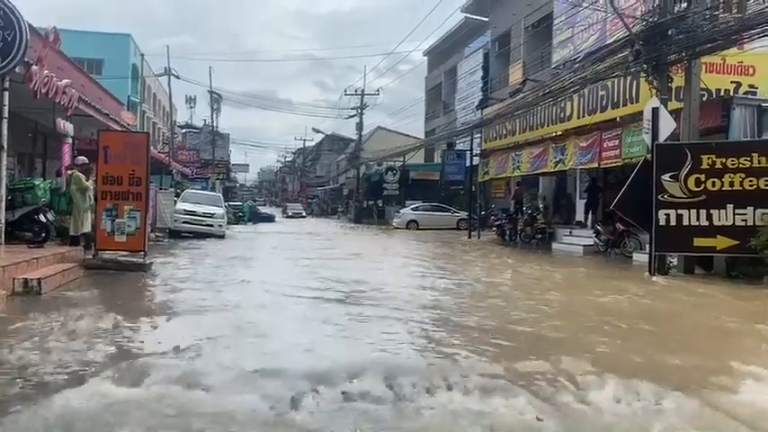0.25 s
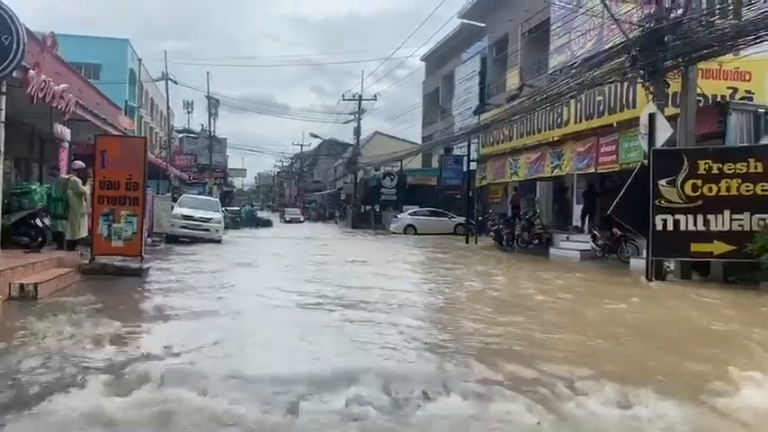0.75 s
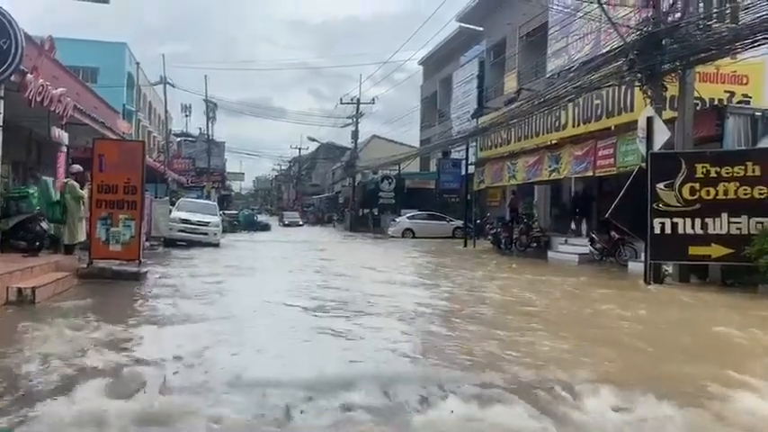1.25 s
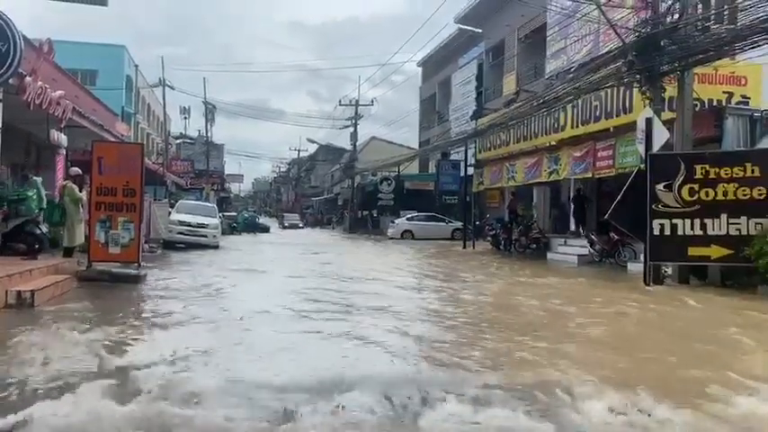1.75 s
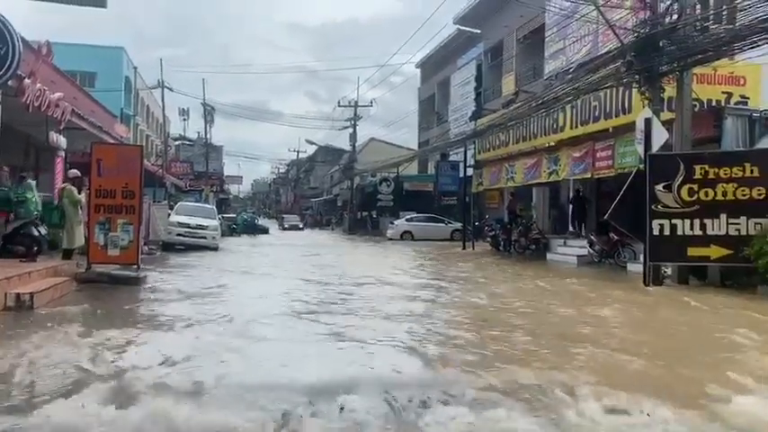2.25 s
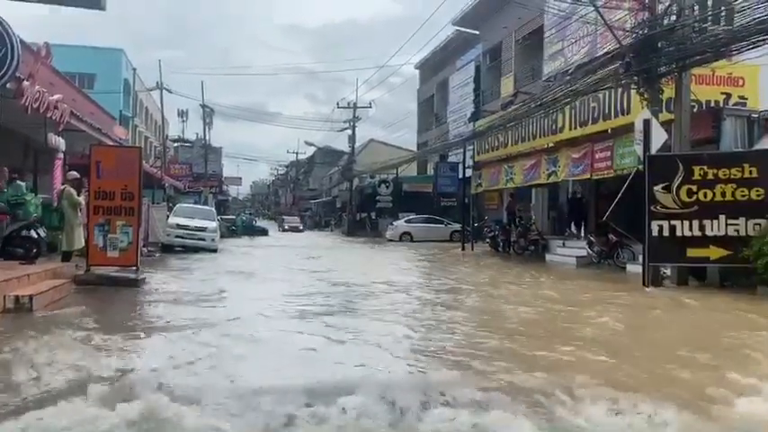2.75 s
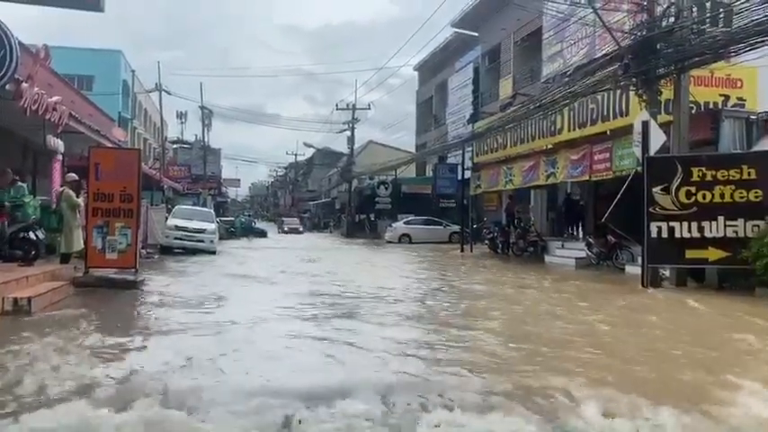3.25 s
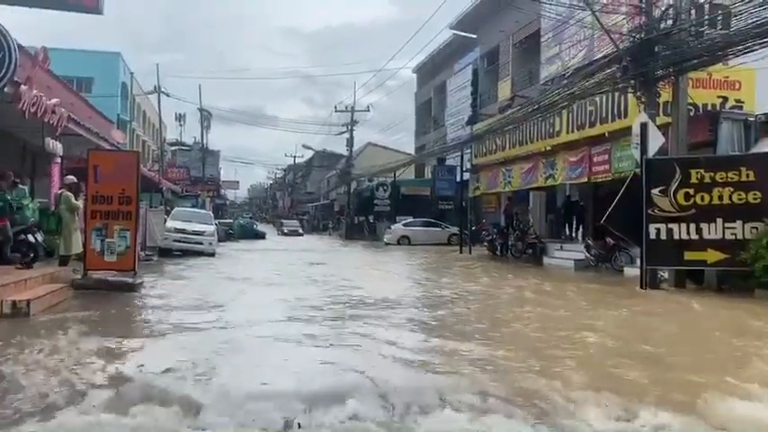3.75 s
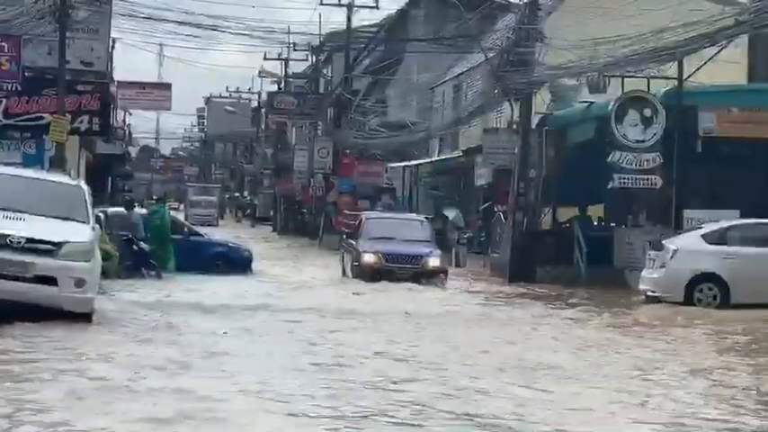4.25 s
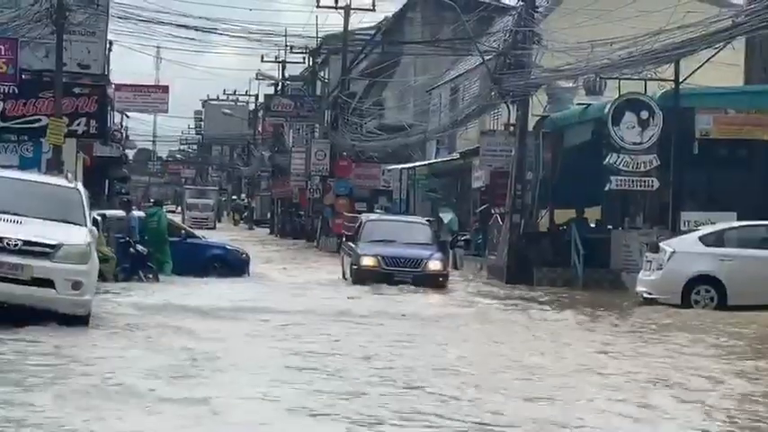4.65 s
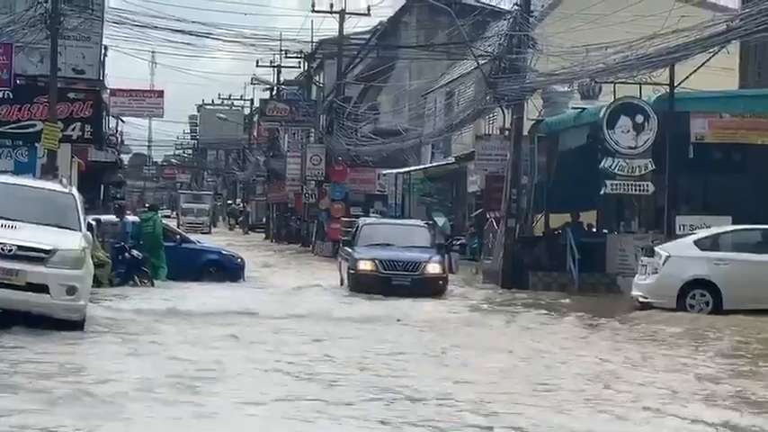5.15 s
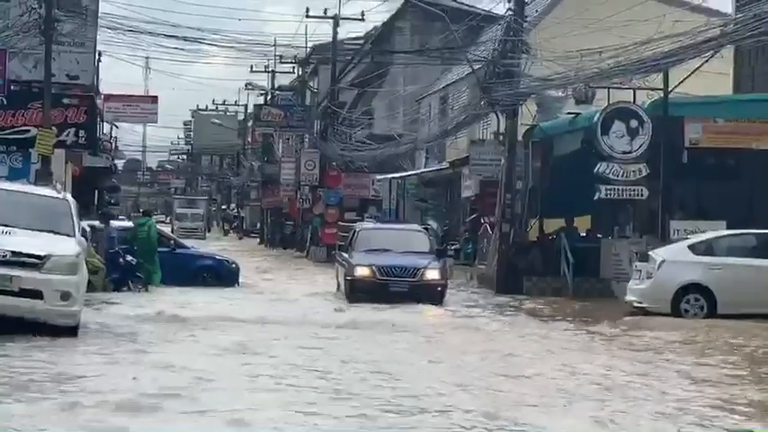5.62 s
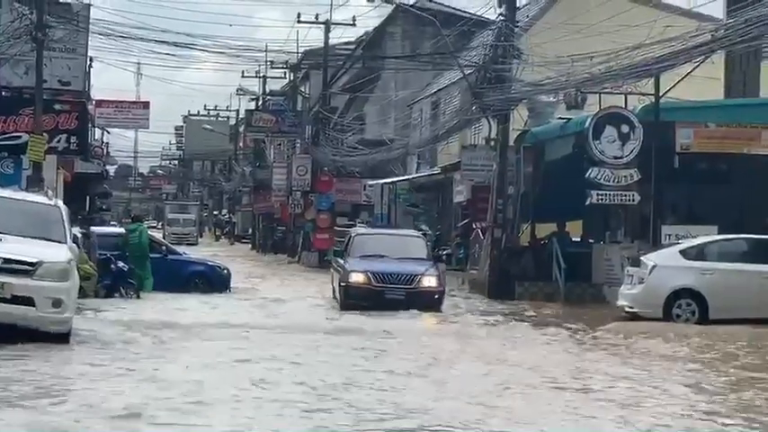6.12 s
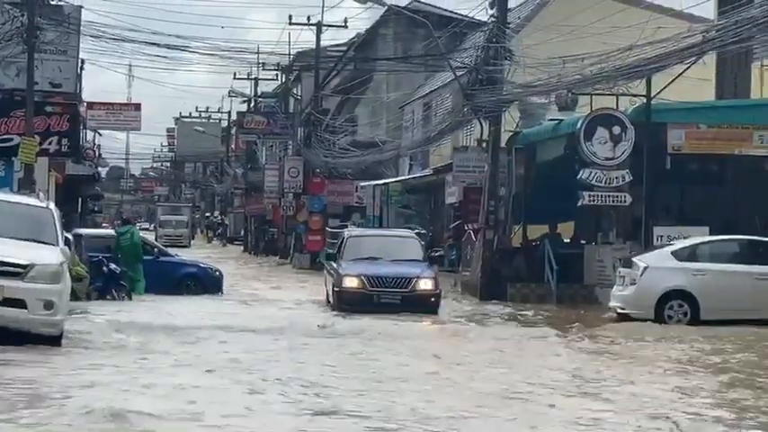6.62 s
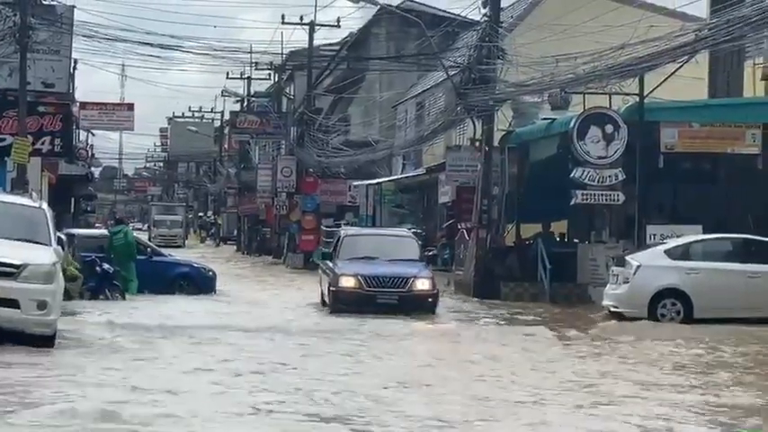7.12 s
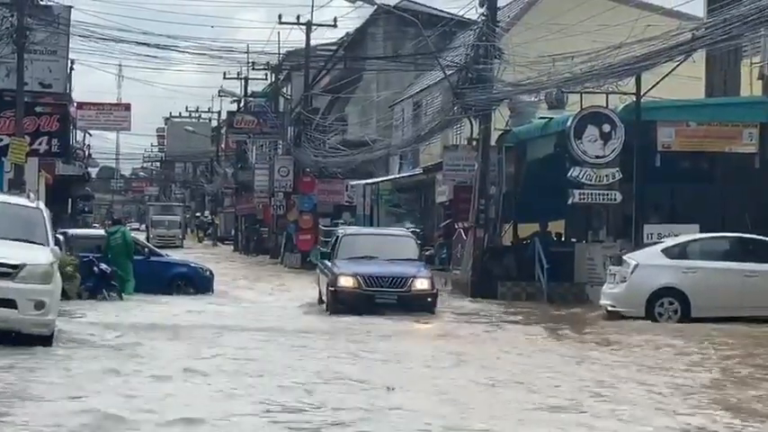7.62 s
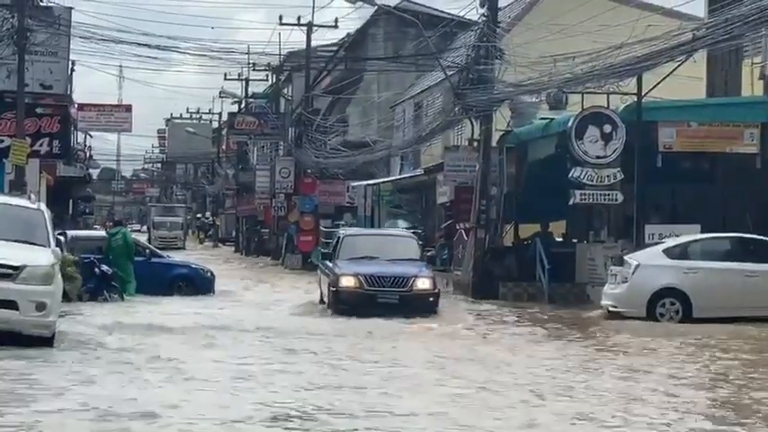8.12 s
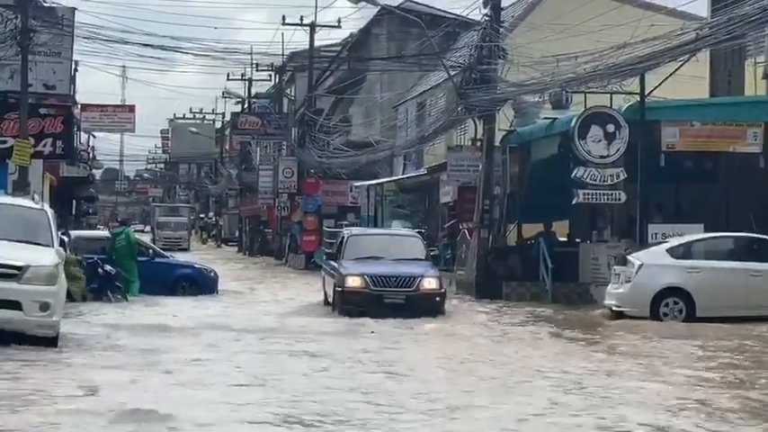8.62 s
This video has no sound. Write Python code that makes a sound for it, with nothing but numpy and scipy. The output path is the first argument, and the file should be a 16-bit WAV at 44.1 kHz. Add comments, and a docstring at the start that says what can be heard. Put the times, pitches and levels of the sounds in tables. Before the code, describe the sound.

Close, wide outdoor stereo of floodwater frothing against a moving vehicle. The first part is a steady, bubbly rush with hissing spray, scattered rising plops and bassy drive rumble. After an abrupt edit the treble sits more centrally, the water slaps and swells unevenly, a low resonant body drone comes and goes, and occasional drops tick nearby.

```python
"""Vehicle wading a flooded street

Heard from on board in the rain: a bow wave of bubbles and patchy noise churns, froths and sprays.
A low noise rumble and a hollow resonant drone lie underneath; air pockets plop as rising sine bubbles.
A few close drops tick as short ringing modes with spatter. A cut with a very short gap joins two passages
of the wading; after it the tone and stereo image change, the wash swells heavier and the drone surges."""
import sys
import numpy as np
from scipy import signal
from scipy.fft import rfft, irfft, next_fast_len
from scipy.io import wavfile
from scipy.ndimage import uniform_filter1d, map_coordinates

SR = 44100
rng = np.random.default_rng(int(sys.argv[2]) if len(sys.argv) > 2 else 0)


def to_wav(sig):
    """Store sig (one row per channel, or 1-D mono) as 16-bit WAV at the path in sys.argv[1].

    Samples outside -1..1 are clipped; the rate is SR.
    """
    pcm = np.clip(np.atleast_2d(sig), -1, 1) * 32767
    pcm = np.round(pcm).astype(np.int16)
    wavfile.write(sys.argv[1], SR, pcm.T)  # frames by channels


N = 391378  # length in samples


def amp(db):
    """Decibels to gain."""
    return 10 ** (np.asarray(db) / 20)


def unit(x):
    """x at rms 1."""
    return x / np.sqrt(np.mean(x ** 2) + 1e-20)


def along(points, hz):
    """(f/Hz, value) points read on a log frequency axis."""
    f, v = np.transpose(points)
    return np.interp(np.log(hz + 1), np.log(f + 1), v)


def curves(rows):
    """One value per sample for each column after the time."""
    s, *cols = np.transpose(rows)
    return [np.interp(np.arange(N) / SR, s, c) for c in cols]


def wobble(rate):
    """A smooth random curve, rate knots a second."""
    s = np.linspace(0, N / SR, 2048)
    knots = rng.standard_normal(1024)
    curve = map_coordinates(knots, [s * rate], mode="wrap")
    return np.interp(np.arange(N) / SR, s, curve)


def swells(rows):
    """The summed lift in dB of (t/s, level/dB, length/s) events that each come and go as a smooth bell."""
    t = np.arange(N) / SR
    return sum(db * np.exp(-((t - s) / length) ** 2) for s, db, length in rows)


def filtered(x, response):
    """x times a response of frequency."""
    m = next_fast_len(N + 8192)
    return irfft(rfft(x, m) * response(np.fft.rfftfreq(m, 1 / SR)), m)[..., :N]


def coloured(x, spectrum):
    """x through a (f/Hz, level/dB) spectrum, at rms 1."""
    return unit(filtered(x, lambda hz: amp(along(spectrum, hz))))


def rush(patchy_db):
    """Mid and side noise whose strength varies in small patches of time and pitch."""
    z = signal.stft(rng.standard_normal((2, N)), nperseg=512)[2]
    field = rng.standard_normal(z.shape[1:])
    field = uniform_filter1d(field, size=4, axis=0)  # across pitch
    field = uniform_filter1d(field, size=6, axis=1)  # across time
    noise = signal.istft(z * amp(patchy_db * unit(field)), nperseg=512)[1]
    return unit(noise[:, :N])


def bubbles(lo_hz, hi_hz, cycles, rise, spread_db, count, size):
    """Mid and side of count bubbles: each rings for some cycles and rises in pitch as it nears the surface."""
    when, pitch, luck, place = rng.random((count, 4)).T[:, :, None]
    hz = lo_hz + (hi_hz - lo_hz) * pitch
    turns = (hz * np.arange(size) / SR).astype(np.float32)
    age = turns / cycles
    strength = amp(spread_db * luck ** 2) * np.sqrt(hz)  # most are faint, a few stand out
    ring = strength * np.exp(-np.pi * age) * np.sin(2 * np.pi * turns * (1 + rise * age / 2))
    index = ((when * N).astype(int) + np.arange(size)).ravel()
    gains = (1, 2 * place - 1)  # mid, side
    return np.array([unit(np.bincount(index, (ring * g).ravel(), N)[:N]) for g in gains])


def water(spectrum, grains, grain_db, patchy_db):
    """A bed of countless merged bubbles, as patchy noise, with the nearest ones on top, at rms 1."""
    return unit(coloured(rush(patchy_db), spectrum) + amp(grain_db) * coloured(grains, spectrum))


def wash():
    """Decibels by which the wash is stronger than usual."""
    # strength of the wash at the bow, steady at first, then swelling: (t/s, level/dB)
    wash_strength = [(0, -27.5), (1, -27), (2, -27), (3.7, -27.5), (4.4, -25.8), (5.5, -24), (6.5, -23.3),
                     (7.4, -26), (7.9, -23.5), (8.4, -24), (8.85, -25.5)]
    usual_db = -25.5
    return curves(wash_strength)[0] - usual_db


def bow_wave():
    """Tumbling water: large bubbles in the churn, small ones in the froth, ticking droplets in the spray."""
    # spectra of the three layers: (f/Hz, level/dB)
    churn_spectrum = [(60, -30), (125, 2), (190, 1.5), (330, 2), (390, -1.5), (480, 1), (720, -1),
                      (950, -6), (1400, -20), (3000, -53)]
    froth_spectrum = [(400, -24), (800, -4), (1100, -1.5), (1400, -1), (1850, 1), (2200, -2.5), (2700, -6),
                      (3600, -12.5), (7000, -31.5)]
    spray_spectrum = [(1500, -19.5), (2800, -3.5), (3800, -1.5), (5000, -3), (7000, -3.5), (8500, -3.5),
                      (10000, -5), (12000, -7.5), (14000, -8.5), (15500, -23)]
    # heavier waves breaking on the bow: (t/s, churn lift/dB, froth lift/dB, length/s)
    waves = [(0.506, 0.7, 1.5, 0.11), (1.4, 0.5, 0.5, 0.072), (2.36, 1.5, 4.5, 0.021), (4.43, 2, -0.7, .07),
             (5.11, 3, 0.5, 0.025), (5.34, 0.5, 1, 0.073), (5.75, 2.5, 1.5, 0.036), (5.941, 2, 2.5, 0.03),
             (6.621, 3.5, 1.5, 0.033), (6.832, 3, 1.6, 0.052), (7.094, 2, 0.3, .07), (7.42, 3, 1.3, 0.064),
             (7.786, -2.5, 3, 0.051), (8.071, 1.5, 1.5, .05), (8.38, 0.5, 2, .045)]
    # sheets of spray thrown up by the bow: (t/s, lift/dB, length/s)
    sheets = [(0.08, 3, 0.12), (0.76, 3, 0.18), (3.66, 3.5, 0.25), (4.62, 3, 0.15)]
    fizz_db = -12.5  # the smallest ringing bubbles, against the spray

    # each layer: level in dB at the usual wash, dB gained per dB more of wash, then its own events
    wash_db = wash()
    churn_db = -27.5 + 0.37 * wash_db + swells([(s, db, length) for s, db, _, length in waves])
    froth_db = -28.5 + 0.37 * wash_db + swells([(s, db, length) for s, _, db, length in waves])
    spray_db = -33 + 0.26 * wash_db + swells(sheets)

    # slow and quick unrest shared by all three, then some of each layer's own
    surge, slosh = wobble(5), wobble(22)
    churn_db = churn_db + 0.25 * surge + 0.59 * slosh + 0.18 * wobble(12)
    froth_db = froth_db + 0.15 * surge + 0.35 * slosh + 0.48 * wobble(12)
    spray_db = spray_db + 0.1 * surge + 0.5 * slosh + 0.19 * wobble(11)

    large = bubbles(259.7, 1177, cycles=19, rise=0.065, spread_db=14.5, count=900, size=2000)
    small = bubbles(803, 4247, cycles=93, rise=0.088, spread_db=14, count=1500, size=1000)
    droplets = bubbles(2250, 15000, cycles=4.1, rise=0.09, spread_db=12, count=5000, size=64)
    fizz = bubbles(2500, 7010, cycles=91, rise=0.03, spread_db=11, count=1300, size=700)

    churn = water(churn_spectrum, large, grain_db=-6.5, patchy_db=0.87)
    froth = water(froth_spectrum, small, grain_db=-8.0, patchy_db=1.24)
    spray = water(spray_spectrum, droplets, grain_db=-7.5, patchy_db=1.8)
    spray = unit(spray + amp(fizz_db) * coloured(fizz, spray_spectrum))
    return amp(churn_db) * churn + amp(froth_db) * froth + amp(spray_db) * spray


def drive_rumble():
    """The vehicle's drive: low noise in a bass-heavy spectrum, its level lumpy."""
    # spectrum of the rumble: (f/Hz, level/dB)
    rumble_spectrum = [(20, -33), (31, -21), (42, -9), (52, -3), (78, 0.5), (102, -2), (135, -13.5),
                       (220, -10), (500, -84)]
    # course of the rumble before its trim: (t/s, level/dB)
    drive_course = [(0, -31), (.7, -36), (1.2, -34.5), (1.9, -33), (2.5, -33.5), (2.85, -33), (3.4, -32.5),
                    (3.9, -31), (4.6, -34), (5.3, -34), (6.1, -31.8), (6.8, -32.5), (7.7, -31.3),
                    (8.4, -31.5), (8.85, -33)]
    trim_db, lumps_db = 0.65, 0.5
    level_db = curves(drive_course)[0] + trim_db + lumps_db * wobble(10)
    return amp(level_db) * coloured(rng.standard_normal((2, N)), rumble_spectrum)


def hollow_drone():
    """The vehicle's body: noise rings its resonances, which surge in level and drift in pitch."""
    # resonances of the body before the drift: (f/Hz, width/Hz, level/dB)
    resonances = [(153.5, 12, -8.5), (177, 9.4, -9), (246, 8.1, -22), (284.7, 15.5, -1),
                  (302.5, 14.5, -0.5), (453.4, 27, -8.5), (687, 123, -13)]
    # level of the drone: (t/s, level/dB)
    drone_course = [(0, -36), (2.4, -36.5), (3.8, -37.5), (3.95, -29), (4.08, -33), (4.3, -31), (4.52, -28),
                    (4.65, -38), (4.83, -27.5), (5.75, -29), (5.95, -22), (6.03, -34), (6.16, -27.5),
                    (6.77, -27), (6.85, -39), (7.01, -28), (7.09, -33), (7.22, -22), (7.3, -30.5),
                    (7.7, -27), (7.82, -37), (7.99, -28), (8.2, -39), (8.4, -31.5), (8.85, -29)]
    # drift of its pitch: (t/s, ratio)
    drift = [(0, 0.99), (4.3, 0.97), (4.9, 1), (5.5, 1.02), (5.95, 1.03), (6.4, 0.93), (6.65, 0.96),
             (7.22, 1.04), (7.45, 0.94), (7.75, 1), (8.3, 1.05)]
    waver, waver_per_s = 0.013, 9  # quick random bends on top of the drift, as a ratio

    def body(f):
        return sum(amp(db) * 1j * f * w / (c * c - f * f + 1j * f * w) for c, w, db in resonances)

    ring = filtered(rng.standard_normal((2, N)), body)
    ring = ring / np.sqrt(uniform_filter1d(ring ** 2, size=7000, axis=1))  # steadied before its level is set
    # reading the ring faster or slower bends its pitch
    clock = np.cumsum(curves(drift)[0] + waver * wobble(waver_per_s)) % N
    bent = np.array([np.interp(clock, np.arange(N), r) for r in ring])
    return amp(curves(drone_course)[0] + 0.3 * wobble(7)) * bent


def gurgles():
    """Close air pockets: each rings as one bubble of rising pitch, with tiny bubbles breaking off as froth."""
    # the pockets, levels before the 5 dB trim: (t/s, peak level/dB, starting f/Hz)
    pockets = [(.247, -23, 1981), (.329, -19, 4330), (0.67, -28, 3273), (.812, -30, 4478),
               (0.869, -22, 2030), (1.413, -16, 1900), (1.688, -25, 4651), (1.962, -21, 2570),
               (2.267, -21, 2420), (2.346, -14, 1950), (2.360, -12.5, 2110), (2.374, -20, 2050),
               (2.396, -15, 1970), (2.904, -16.5, 2800), (2.944, -14.5, 2110), (3.390, -18, 1640),
               (3.453, -23, 2256), (3.679, -24, 3703), (3.972, -25, 4670), (4.557, -19, 1540),
               (5.110, -16, 854), (5.745, -10, 699), (6.493, -21, 3525), (6.512, -16, 2030),
               (6.784, -19, 4250), (7.213, -17, 1972), (7.442, -14.5, 1529), (8.056, -17, 1960),
               (8.532, -15, 1798), (8.729, -18, 2060)]
    t60_s, attack_s, rise_per_s = 0.066, 0.00086, 1.1
    froth_db, trim_db = -6, -5.0
    out, t = np.zeros(N + SR), np.arange(SR // 10) / SR
    envelope = (1 - np.exp(-t / attack_s)) * amp(-60 * t / t60_s)
    for s, db, hz in pockets:
        bubble = envelope * np.sin(2 * np.pi * hz * t * (1 + rise_per_s * t / 2))
        band = signal.butter(2, [hz * .85, hz * 1.18], "band", fs=SR)
        froth = signal.lfilter(*band, rng.standard_normal(len(t)))
        plop = bubble + amp(froth_db) * envelope * unit(froth)
        out[round(s * SR):][:len(t)] += amp(db + trim_db) * plop / np.abs(plop).max()
    return out[:N]


def drops():
    """Close drops: each gives a sharp tick of four decaying modes and a short noise spatter."""
    # drops landing close by: (t/s, peak level of the ring/dB, f/Hz)
    landings = [(3.1625, -8, 2800), (3.172, -19, 2000), (3.187, -19, 2300), (3.621, -18, 2600),
                (3.643, -10.5, 3050), (3.864, -23, 3000), (3.883, -21, 5470), (3.962, -17, 3730),
                (4.138, -19, 2670), (4.661, -13.5, 3600), (4.858, -20, 3590), (6.022, -19, 3800),
                (6.037, -17, 2850), (6.645, -20, 7500), (7.789, -18, 2670), (8.433, -19, 7480),
                (8.490, -11, 4890), (8.595, -19, 2577)]
    # ring of a drop: (multiple of its pitch, level/dB, t60/s)
    modes = [(.65, -6, .009), (.88, 1, .007), (1.1, 0.5, 0.0063), (1.5, -1, 0.0081)]
    spatter_db, spatter_t60_s = -18, 0.075  # against the ring's peak
    out, t = np.zeros(N + SR), np.arange(SR // 10) / SR
    for s, db, hz in landings:
        ring = np.zeros(len(t))
        for k, (ratio, level, t60) in enumerate(modes):
            polarity = (-1) ** k
            ring += polarity * amp(level - 60 * t / t60) * np.sin(2 * np.pi * hz * ratio * t)
        band = signal.butter(2, [hz / 2, hz * 2], "band", fs=SR)
        spatter = unit(signal.lfilter(*band, rng.standard_normal(len(t))))
        tick = ring / np.abs(ring).max() + amp(spatter_db - 60 * t / spatter_t60_s) * spatter
        out[round(s * SR):][:len(t)] += amp(db) * tick
    return out[:N]


def placed(bed, image):
    """Mid and side: the diffuse wash, plus the part of the centre that leans to one ear or reaches it first."""
    hz_points, *cols = np.transpose(image)

    def read(k, hz):
        return along(np.transpose([hz_points, cols[k]]), hz)

    diffuse = filtered(bed[1], lambda hz: amp(read(0, hz)))
    direct = filtered(bed[0], lambda hz: read(1, hz) + 1j * read(2, hz))
    return np.array([bed[0], diffuse + direct])


def scene():
    """Two passages joined at a cut, each with its own tone and stereo image; the bass is alike in both ears."""
    # brief gap at the cut: (t/s, gain)
    gap = [(3.81, 1), (3.835, 0.54), (3.855, 0.014), (3.872, 0.52), (3.895, 0.9)]
    # colour of water and vehicle before the cut: (f/Hz, level/dB)
    early_tone = [(150, 0.5), (230, -2.5), (460, -0.5), (750, -1), (1250, 1), (1750, -3), (2150, -1.5),
                  (3100, -3), (4300, -1), (7300, -4), (10000, 0)]
    # stereo images before and after the cut: (f/Hz, gain of the diffuse side/dB,
    # lean to the left, lead of the left; both as shares of the mid)
    early_image = [(60, -27, -0.027, 0), (160, -16.6, -.04, .05), (300, -15, -.02, 0.3),
                   (500, -10, 0.071, .43), (800, -5.5, .13, .34), (1100, -.3, .07, .26),
                   (1300, -2.8, .02, .19), (1500, .8, -.12, 0), (1750, -2, -.06, -.31),
                   (2200, -6.6, -.05, .03), (2700, -3, 0, .28), (3300, -2, .09, .28),
                   (4100, -4.5, 0.022, .05), (5200, -1, 0.18, .12), (6600, -4, 0.015, -0.27),
                   (9000, -43, 0, -0.033)]
    late_image = [(60, -29, 0, -0.011), (160, -18, -.04, 0.026), (300, -17, -.04, 0.26),
                  (550, -11.5, .08, 0.31), (800, -10, .12, .36), (1050, -3.2, .2, .4),
                  (1400, -2, 0.032, .16), (1700, -2.5, -0.035, -.09), (1950, -7.4, -.04, -0.09),
                  (2350, -22.5, 0, 0), (3200, -43, 0, 0), (4000, -69, 0, 0), (6700, -74, 0, 0),
                  (8200, -36, 0, 0.084)]

    bed = bow_wave() + drive_rumble() + hollow_drone()
    early = placed(filtered(bed, lambda hz: amp(along(early_tone, hz))), early_image)
    late = placed(bed, late_image)
    cut_s = gap[2][0]  # the bottom of the gap
    mid, side = np.where(np.arange(N) / SR < cut_s, early, late)
    stereo = np.array([mid + side, mid - side])
    return stereo * curves(gap)[0] + gurgles() + drops()


def record(dry):
    """In the top octave the right channel leads in phase; nothing is kept above the band limit."""
    # phase by which the right channel leads: (f/Hz, phase/rad)
    right_lead = [(8500, 3.08), (10100, 6.67), (12050, 9.3), (13900, 12.7), (15600, 14.2)]
    in_step_hz, top_hz = 7210, 15600  # no added lead below the first, silence from the second up
    points = [(in_step_hz, 0)] + right_lead

    def response(hz):
        lead = np.interp(hz, *np.transpose(points))
        return np.exp(.5j * np.outer([-1, 1], lead)) * (hz < top_hz)  # half the lead on each channel

    return filtered(dry, response)


dry = scene()
out = record(dry)
to_wav(out)
```